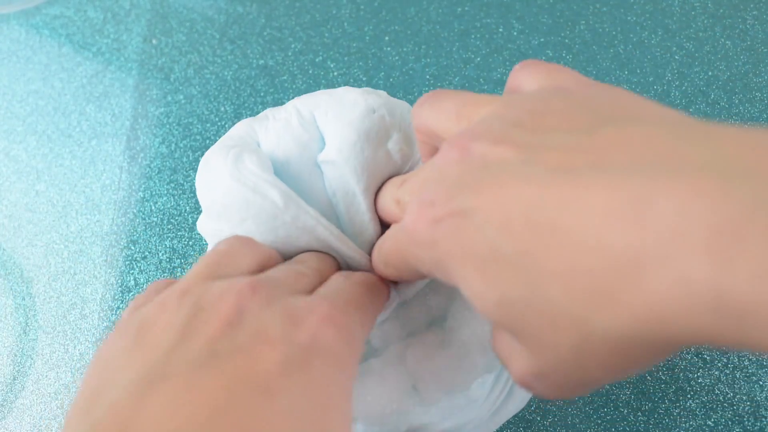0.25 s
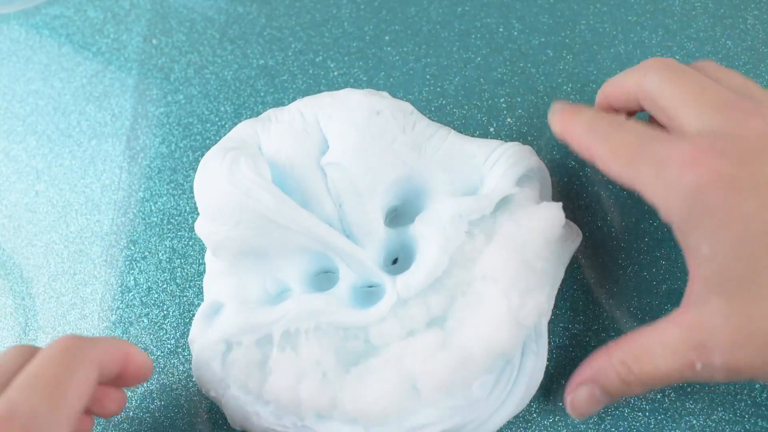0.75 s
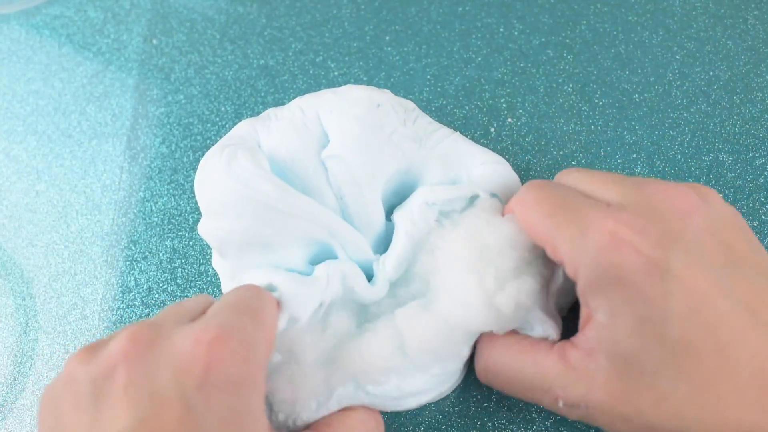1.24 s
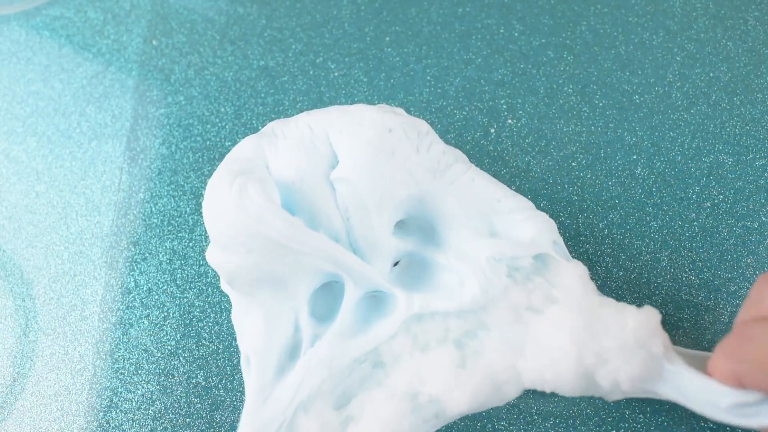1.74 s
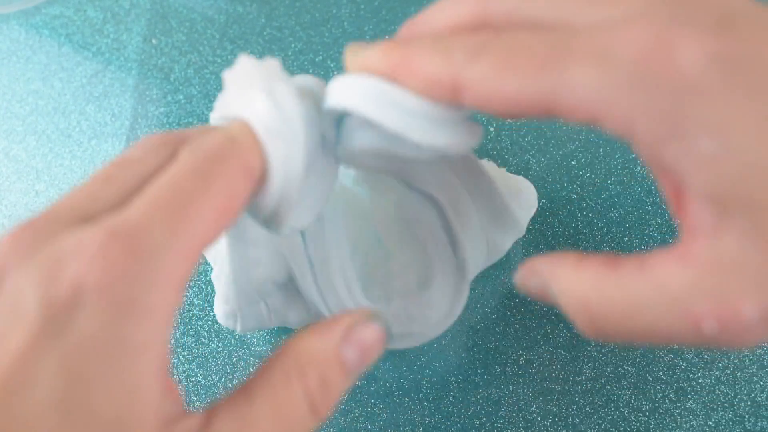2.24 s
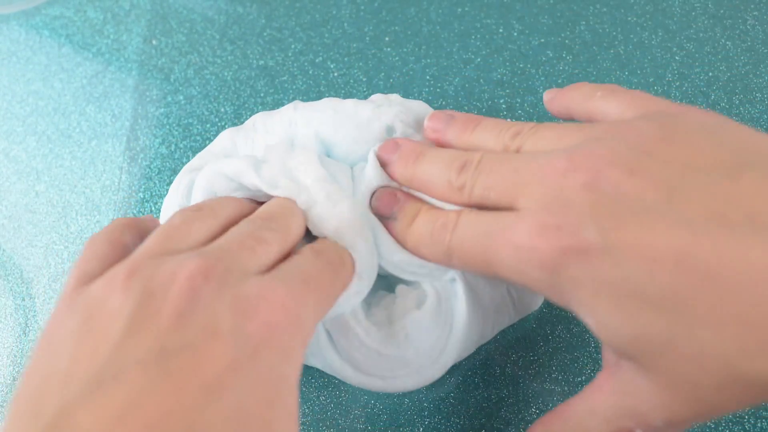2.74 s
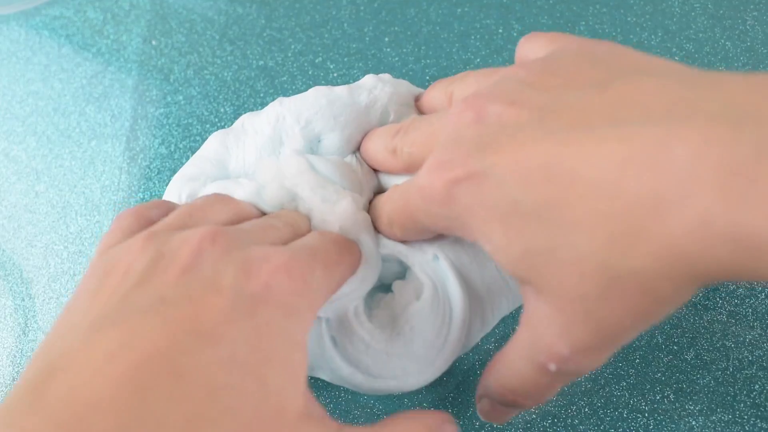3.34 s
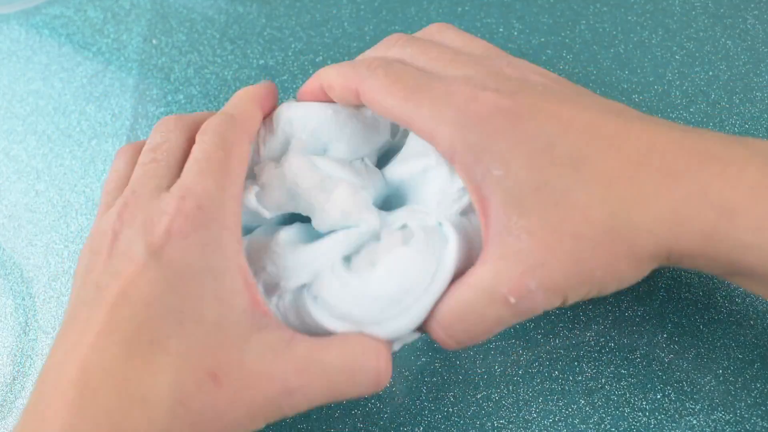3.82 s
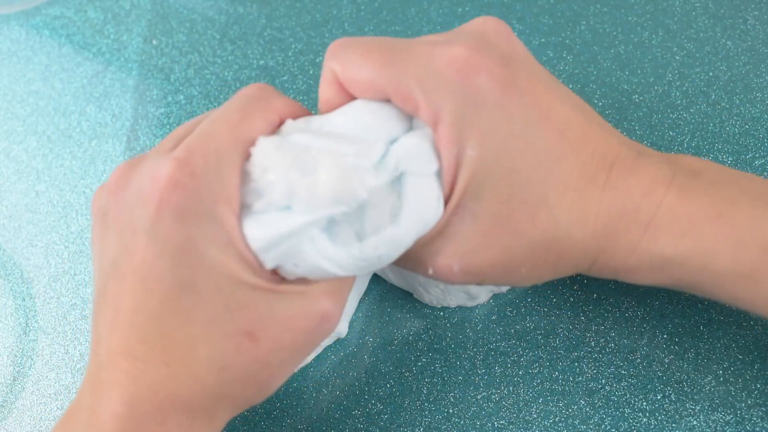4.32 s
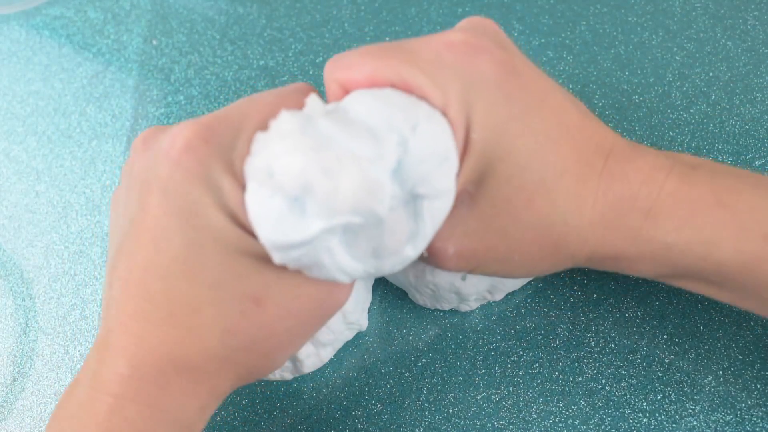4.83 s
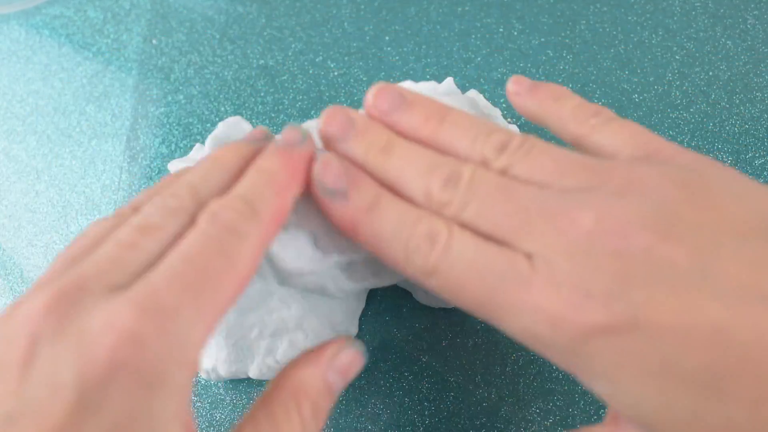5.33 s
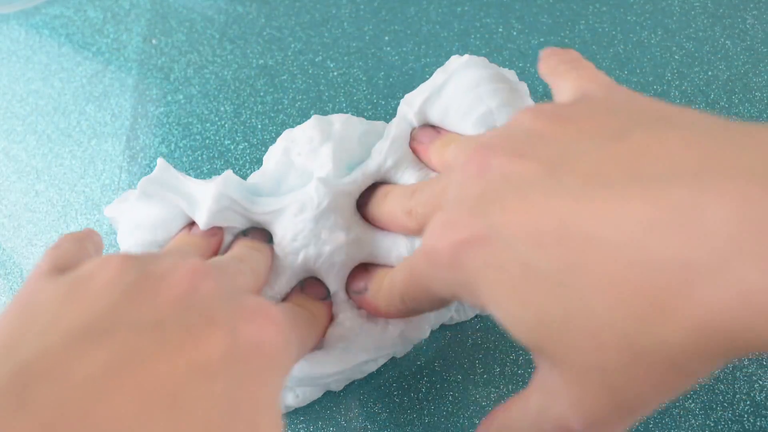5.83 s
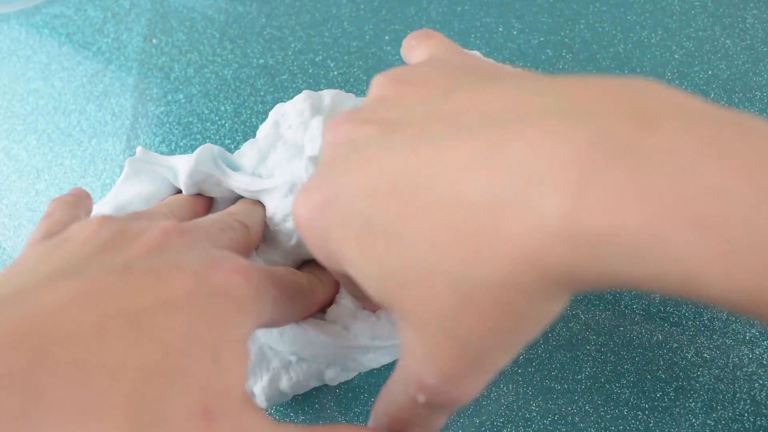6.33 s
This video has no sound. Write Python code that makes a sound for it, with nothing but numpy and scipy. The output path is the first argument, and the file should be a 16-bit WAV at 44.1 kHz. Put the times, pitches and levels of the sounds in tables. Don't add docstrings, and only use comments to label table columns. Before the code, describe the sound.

Hands squeeze and stretch foamy slime up close, with sharp bright pops, fine fizzing crackle, wet squelches and soft low thumps on the table.

```python
import sys
import numpy as np
from scipy import signal
from scipy.fft import rfft, irfft, next_fast_len
from scipy.io import wavfile

SR = 44100
rng = np.random.default_rng(int(sys.argv[2]) if len(sys.argv) > 2 else 0)


def transcribe(signal):
    frames = np.atleast_2d(signal).T
    limited = np.clip(frames, -1, 1)
    pcm = np.round(limited * 32767).astype(np.int16)
    wavfile.write(sys.argv[1], SR, pcm)


def decibels_to_gain(level_db):
    exponent = np.asarray(level_db, float) / 20
    return 10 ** exponent


N = 289737


def rms_one(x):
    return x / np.sqrt(np.mean(x ** 2) + 1e-20)


def colour(x, spectrum):
    size = next_fast_len(N)
    hz = np.maximum(np.arange(size // 2 + 1) * SR / size, 1)
    points_hz, points_db = np.array(spectrum).T
    gain = decibels_to_gain(np.interp(np.log(hz), np.log(points_hz), points_db))
    return irfft(rfft(x, size) * gain, size)[..., :N]


def resonate(x, hz, width_hz):
    r = np.exp(-np.pi * width_hz / SR)
    feedback = [1, -2 * r * np.cos(2 * np.pi * hz / SR), r * r]
    return signal.lfilter([(1 - r * r) / 2, 0, (r * r - 1) / 2], feedback, x)


def drift(rate_hz):
    r = np.exp(-2 * np.pi * rate_hz / SR)
    noise = rng.standard_normal(N + SR)
    return rms_one(signal.lfilter([1], [1, -2 * r, r * r], noise)[SR:])


def pan(left_right_db):
    return decibels_to_gain([[left_right_db / 2], [-left_right_db / 2]])


# f/Hz, level/dB
HISS_COLOUR = [(18, -44), (30, 3), (145, 2.5), (204, -2.5), (295, 2.5), (364, -10), (486, -1), (721, -14.5),
               (2060, -6), (4910, -26), (8980, -1.5), (9970, 4), (10800, -9), (12500, -13), (14400, -24),
               (16000, -22)]
# f/Hz, share of shared power/1
HISS_ALIKE = [(60, 0.53), (240, 0.35), (950, 0.32), (3770, 0.054), (15000, 0.065)]


def hiss():
    shared, left, right = rng.standard_normal((3, N))
    alike = [(hz, 10 * np.log10(np.clip(c, .01, .99))) for hz, c in HISS_ALIKE]
    apart = [(hz, 10 * np.log10(1 - np.clip(c, .01, .99))) for hz, c in HISS_ALIKE]
    noise = colour(shared, alike) + colour(np.array([left, right]), apart)
    whine_hz, whine_width_hz = 10120, 500
    whine = resonate(resonate(noise, whine_hz, whine_width_hz), whine_hz, whine_width_hz)
    whine = decibels_to_gain(-62 + 2.5 * drift(18)) * rms_one(whine)
    return decibels_to_gain(-55) * rms_one(colour(noise, HISS_COLOUR)) + whine


def room(x):
    t60_s, first_wall_s = 0.17, .006
    t = np.arange(round(.4 * SR)) / SR
    tail = rng.standard_normal((2, len(t))) * decibels_to_gain(-60 * t / t60_s) * (t > first_wall_s)
    tail = signal.lfilter([.5], [1, -.35], tail)
    tail = tail / np.sqrt((tail ** 2).sum(1, keepdims=True))
    return signal.fftconvolve(x, tail, axes=1)[:, :N]


# t/s, level/dB
STRETCH = [(0, -52.5), (.3, -52), (.5, -59.5), (.82, -59), (1.1, -55), (1.15, -42.5), (1.62, -45.5),
           (1.88, -53), (2.15, -50), (3.05, -50.5), (3.45, -57), (3.8, -64), (3.9, -37.5), (4.55, -47.5),
           (5.0, -50.5), (5.39, -65), (5.47, -51), (6.57, -53.5)]
# t/s, hold/s, crackle level/dB, squelch level/dB, level of weight on the table/dB
PEELS = [(0.206, 0.077, -51, -62, -74), (0.38, 0.017, -66, -59, -59.5), (0.422, 0.23, -65, -81, -59.5),
         (0.648, .014, -28.5, -33, -39), (0.671, 0.019, -31, -38.5, -38), (0.722, 0.039, -60, -55, -55),
         (0.857, 0.061, -68, -60, -43.5), (0.954, 0.26, -53, -58.5, -49), (1.361, 0.013, -53, -51.5, -54),
         (1.671, 0.088, -43.5, -64, -79), (2.13, 0.044, -48.5, -55, -67), (2.822, 0.028, -61, -65.5, -52.5),
         (3.481, 0.013, -51, -53.5, -53), (3.51, 0.066, -32, -52, -58), (3.534, 0.02, -37, -29, -39),
         (3.595, 0.07, -70, -55, -57), (3.795, 0.025, -55, -53, -48), (3.944, 0.088, -40, -50, -61.5),
         (4.525, 0.056, -47.5, -60, -55.5), (4.71, 0.073, -35.5, -47, -76), (4.987, 0.019, -37, -45.5, -55),
         (5.021, 0.0072, -27, -37, -47), (5.046, 0.052, -26.5, -31.5, -43),
         (5.108, 0.036, -31, -40.5, -53.5), (5.153, 0.022, -39.5, -47.5, -54),
         (5.192, 0.032, -45.5, -53.5, -56), (5.598, 0.11, -70, -63, -59.5),
         (6.142, 0.079, -46.5, -59.5, -76), (6.486, .1, -33.5, -42.5, -44.5)]
# rate/(dB/s) of crackle, squelch, table
RELEASE_DB_PER_S = [792, 449, 340.5]


def tearing():
    onset_db_per_s, sag_db_per_s = 609, 22.5
    t = np.arange(0, N + 64, 64) / SR
    stretch_db = np.interp(t, *np.transpose(STRETCH))
    swing_db = stretch_db + 50
    squelch_db = -60.5 + .75 * swing_db
    rumble_db = -74 + 0.12 * swing_db
    power = decibels_to_gain([stretch_db, squelch_db, rumble_db]) ** 2
    for start, hold, *levels_db in PEELS:
        onset = onset_db_per_s * np.maximum(start - t, 0)
        sag = sag_db_per_s * np.clip(t - start, 0, hold)
        release = np.outer(RELEASE_DB_PER_S, np.maximum(t - start - hold, 0))
        power = power + decibels_to_gain(np.reshape(levels_db, (3, 1)) - onset - sag - release) ** 2
    return [np.interp(np.arange(N) / SR, t, 10 * np.log10(p)) for p in power]


# f/Hz, bandwidth/Hz, level/dB
TABLE_MODES = [(83.5, 123, -0.5), (165, 6.8, 8.5), (290, 20, 2), (560, 340, -8.5)]
# t/s, peak level/dB, main f/Hz
THUMPS = [(0.448, -29, 112), (0.626, -35, 128), (0.839, -22.5, 165), (.65, -33, 100), (.68, -40, 130),
          (0.701, -41, 120), (.897, -26, 159), (.917, -34, 152), (.962, -44, 169), (1.061, -42, 290),
          (1.368, -47.5, 156), (3.473, -44, 200), (3.491, -40, 200), (3.523, -23, 147), (3.537, -31, 119),
          (3.587, -37, 150), (3.792, -35.5, 290), (3.803, -37.5, 160), (3.93, -34.5, 157),
          (4.514, -45, 159), (4.548, -37.5, 304), (4.685, -49, 80.6), (4.831, -42, 300),
          (5.628, -44.5, 113)]


def table_modes(push):
    return sum(decibels_to_gain(db) * resonate(push, hz, width_hz) for hz, width_hz, db in TABLE_MODES)


def table(rumble_db):
    shake = signal.lfilter([1], [1, -.96], rng.standard_normal(N) * decibels_to_gain(2.6 * drift(14)))
    rumble = decibels_to_gain(rumble_db - 0.5) * rms_one(table_modes(shake))
    t = np.arange(6000) / SR
    out = np.append(rumble, 0 * t)
    for s, peak_db, hz in THUMPS:
        push = -np.exp(-(t * hz / .11 - 2) ** 2)
        knock = resonate(push, hz, 0.14 * hz) + 0.25 * table_modes(push)
        at = round(s * SR)
        out[at:at + len(t)] += decibels_to_gain(peak_db) * knock / np.abs(knock).max()
    return out[:N]


# t/s, peak level/dB
PUFFS = [(1.6668, -29.5), (4.683, -31), (3.6, -29)]


def puffs():
    t, width_s = np.arange(N) / SR, 0.0002
    return sum(decibels_to_gain(db) * np.exp(-((t - s) / width_s) ** 2) for s, db in PUFFS)


def grains(per_s, low_hz, high_hz, cycles, spread_db, clump_db, patch_db, wide_db):
    sizes = decibels_to_gain(spread_db * np.minimum(rng.exponential(1, N), 4))
    sizes = sizes * rng.choice([-1, 1], N) / np.sqrt(per_s)
    born = rng.random(N) < per_s * decibels_to_gain(clump_db * drift(25)) / SR
    place = pan(1) ** (wide_db * np.clip(rng.standard_normal(N), -1.5, 1.5))
    clicks = place * sizes * born
    dealt = rng.integers(0, 12, N)
    patches = [decibels_to_gain(patch_db * drift(19)) for _ in range(4)]
    out = 0
    for k, hz in enumerate(np.geomspace(low_hz, high_hz, 12)):
        out = out + resonate(clicks * (dealt == k) * patches[k // 3] + 1e-18, hz, hz / cycles)
    return rms_one(out)


def gurgle(rumble_db):
    lumps = grains(250, 315, 960, cycles=5.6, spread_db=-0.5, clump_db=4.0, patch_db=5.5, wide_db=13.0)
    return decibels_to_gain(rumble_db - 6) * lumps


def squelch(level_db):
    per_s = np.interp(level_db, [-60, -46], [1800, 5000])
    wet = grains(per_s, 397, 3270, cycles=2.2, spread_db=2.5, clump_db=1.9, patch_db=2.2, wide_db=12.5)
    hollow = resonate(wet, 1200, 330)
    return decibels_to_gain(level_db) * (wet + decibels_to_gain(-14) * hollow)


# f/Hz, level/dB
CRACKLE_COLOUR = [(880, -35), (1500, -12), (1870, -15), (2250, -2.5), (2540, 6), (2800, 2.5), (9280, 8.5),
                  (13800, 1.5), (16000, 2)]


def crackle(level_db):
    per_s = np.interp(level_db, [-50, -36], [4500, 18000])
    cells = grains(per_s, 2000, 13700, cycles=4.3, spread_db=3.0, clump_db=2.5, patch_db=1.95, wide_db=15.5)
    return decibels_to_gain(level_db - 1.9) * rms_one(colour(cells, CRACKLE_COLOUR))


# t/s, peak level/dB, f/Hz, left-right level/dB
BLIPS = [(.278, -55, 990, 0), (0.628, -18, 1410, -7), (.653, -32.5, 675, -12), (.84, -35.5, 880, 5),
         (.84, -32.5, 292, 5), (1.74, -46.5, 1500, 0), (3.472, -44, 2000, 0), (3.49, -42, 2020, 0),
         (1.36, -41.5, 1420, 0), (1.377, -40, 2500, 0), (1.427, -47, 1200, 3), (1.78, -42, 2360, 0),
         (1.85, -52, 1400, 0), (2.59, -54, 710, 0), (3.077, -48, 1690, 0), (3.526, -26, 700, 12),
         (3.536, -29, 950, 0), (3.551, -31, 560, 0), (3.566, -34.5, 404, 3), (4.107, -31, 1710, 0),
         (6.195, -51, 1500, 0), (4.986, -45.5, 470, -2), (5.015, -34.5, 815, 2), (5.22, -46, 1200, 3),
         (0.682, -35.5, 600, 14), (0.838, -32, 520, -9), (0.888, -39, 745, 6), (1.972, -45, 1570, -4),
         (2.055, -48.5, 985, -1), (2.802, -34, 2440, 0), (1.263, -41, 3000, 0), (2.873, -47, 856, 2),
         (3.789, -51, 820, 9), (4.514, -57, 1260, 2), (4.791, -32, 1470, -4), (4.82, -45.5, 870, 13),
         (6.255, -45.5, 970, 4)]


def blips():
    size = 2048
    out, t = np.zeros((2, N + size)), np.arange(size) / SR
    for s, peak_db, hz, pan_db in BLIPS:
        decay = decibels_to_gain(-60 * t * hz / 15.4)
        ring = np.sin(2 * np.pi * hz * t) * decay * np.minimum(t / 0.00095, 1)
        at = round(s * SR)
        out[:, at:at + size] += decibels_to_gain(peak_db + 9.5) * ring * pan(pan_db)
    return out[:, :N]


# t/s, peak level/dB, ring f/Hz, left-right level/dB
TICKS = [(0.6507, -2, 3000, 5.5), (0.6507, -3, 2860, -6), (.6505, -7.5, 7500, -1), (1.1278, -18, 3950, 3),
         (1.1862, -15.5, 7970, 2), (1.2605, -24, 9500, -5), (1.317, -12.5, 7800, 1.5),
         (1.5016, -8.5, 10800, -1), (1.518, -7.5, 10300, -2.5), (1.5956, -18.5, 10100, -7.5),
         (1.6534, -6, 8100, 1), (1.667, -0.5, 8000, -0.5), (2.16, -24, 7900, -9),
         (2.8482, -10, 10200, -2.5), (2.4198, -30.5, 2980, -1), (2.8816, -24, 9100, 0),
         (2.92, -16.5, 9260, -9), (2.9748, -25, 9500, -1), (4.1015, -10.5, 9170, -8),
         (4.1151, -9, 7900, 1.5), (4.1866, -12, 6070, 1.5), (4.226, -19, 9780, 1.5),
         (4.2926, -6.5, 7400, -1.5), (4.4019, -16, 6600, -8), (1.6671, -25, 1510, -1),
         (2.274, -37, 4000, 2), (2.606, -36, 6540, -.5), (2.606, -37, 2200, 2), (2.705, -37, 3000, 0),
         (2.791, -30, 9000, 3.5), (3.0028, -25.5, 6500, 1), (3.0473, -39, 7000, 2.5), (3.051, -38, 2000, 2),
         (3.089, -37, 5500, 0), (3.1321, -32, 7480, 1.5), (3.267, -43, 3500, 0), (3.383, -50, 3500, 6),
         (3.4324, -41, 4000, 4), (5.346, -31.5, 8000, 8.5), (5.4868, -25, 7770, -1.5),
         (5.518, -30, 7000, 0), (5.538, -22, 7000, 1), (6.245, -24, 6490, 5.5), (6.339, -37, 5000, 1),
         (4.758, -16, 9600, -13.5), (4.7603, -9.5, 10470, .5), (4.8118, -8.5, 9220, 2)]
SPRITZES = [(0.0155, -29, 9050, 7), (0.158, -27, 7550, -1), (.228, -32, 10600, -.5), (0.6255, 2, 8100, 0),
            (0.8893, -28, 1330, 1), (1.669, -2.5, 7900, -2.5), (2.263, -27, 9100, 1.5),
            (2.3898, -21.5, 10100, 2), (2.675, -12, 9000, 2.5), (2.6792, -20, 2960, -1.5),
            (2.914, -21.5, 9500, -2), (2.9492, -19.5, 7300, -1.5), (4.0001, -0.5, 7100, -1.5),
            (4.3696, -18.5, 9000, 6), (4.455, -9, 6860, 2), (4.493, -16, 10340, 2),
            (4.5467, -20.5, 9100, -2.5), (4.6202, -15, 8440, 2.5), (4.6423, -19, 11640, 2),
            (4.683, 7.5, 5970, -1.5), (4.686, -3, 3250, 9), (4.7497, -8.5, 8900, -2.5),
            (4.8468, -18.5, 13480, 14), (4.8568, -13.5, 8800, 1.5), (4.912, -12.5, 10300, 0),
            (5.017, -19, 7600, -17), (2.288, -30, 7000, 3), (2.352, -40, 10100, 7), (2.454, -34, 6000, 4),
            (2.508, -29.5, 9000, 1), (2.769, -34, 9220, 0), (6.1367, -28, 7910, 4), (6.372, -35, 10100, 8),
            (6.4685, -25, 9000, 1.5), (6.485, -20, 8880, 3), (5.4341, -12.5, 10700, -2.5),
            (5.6495, -20, 7500, -5)]
SPLATS = [(.0071, -25.5, 7360, -2), (0.8385, -17.5, 1730, -4.5), (.8388, -29, 6000, 2),
          (0.896, -23.5, 2700, 1), (1.03, -27.5, 6340, 1.5), (1.062, -34, 2150, 0),
          (1.4345, -17.5, 7800, -4), (2.14, -17.5, 9700, -4.5), (3.2134, -20, 7940, 0),
          (3.8687, -20.5, 7740, -2), (3.9289, 0, 8450, 2.5), (3.9316, 2, 9800, 1.5), (4.0123, -9, 8700, 3),
          (4.0398, -20, 1700, -2), (4.255, -27, 13440, 0), (4.344, -20, 8800, -2),
          (4.4288, -27, 9160, -2.5), (4.948, -15, 6000, 5.5), (5.504, -30, 4460, -3),
          (5.5442, -17.5, 8250, -3), (5.6322, -13.5, 2520, -3.5), (5.6653, -20, 9300, -1.5),
          (5.7989, -23, 6930, -3), (5.886, -24, 5040, 5.5)]
SNAPS = [(.1394, -32, 2300, 1), (0.347, -18.5, 7900, 1.5), (0.3963, -26, 8100, -3),
         (0.4364, -23, 5300, 1.5), (0.6263, 4, 3020, 1), (.628, 0, 2900, 2), (0.6421, 1, 3000, -7),
         (.677, -13, 7000, 2.5), (0.696, -11, 7400, 2), (1.686, -28, 2200, 0), (1.2204, -16.5, 7200, -3),
         (1.2753, -15.5, 8400, -3), (1.2996, -12.5, 8340, -3), (2.0277, -21.5, 11700, -9.5),
         (2.618, -26, 9400, -1), (2.641, -25.5, 2580, -3.5), (2.721, -18.5, 8650, -3),
         (2.8862, -28, 9600, 4), (3.9054, -9, 7200, -6), (4.0863, -23, 1980, 3), (4.335, -21, 3500, -1),
         (4.984, -12, 6400, -6.5), (5.0472, -10, 5500, -9.5), (5.059, -13.5, 8500, -4.5),
         (5.5627, -13.5, 7850, -2), (5.653, -25, 8570, -1), (5.6622, -23, 10600, -1),
         (6.0241, -24, 3540, 3), (6.101, -28, 8000, 1.5)]
SMACKS = [(2.7998, -15.5, 2190, 0.5), (3.5237, 0.5, 2160, -2.5), (4.1078, -11.5, 5810, -3.5),
          (4.515, -13, 7700, -2.5), (5.089, -16, 4000, 2), (6.2624, -22, 3830, 0),
          (6.4356, -28.5, 6200, -2), (6.5206, -16, 6720, 0), (6.5521, -12, 8300, 3)]
PRICKS = [(0.1121, -29, 9630, 3.0), (0.1343, -32.5, 2180, 2), (0.1704, -37, 10100, 1),
          (0.1935, -29, 10100, 3.0), (0.2234, -31, 9820, -1), (0.2628, -32, 10200, -1),
          (0.4174, -34, 10100, 2.0), (1.1079, -34, 10100, 1), (1.1158, -26, 4860, -2),
          (1.1474, -32, 9540, -1.5), (1.1578, -25, 8110, 1.0), (1.2044, -24, 7080, -3),
          (1.3112, -17, 9540, 1.5), (1.3384, -33, 9820, -1.0), (1.3604, -27, 9330, -0.5),
          (1.4134, -23, 7500, -4.5), (1.4584, -22, 8130, -1.5), (1.4664, -23, 9930, -2.5),
          (1.5444, -28, 10050, -1.5), (1.5854, -24, 8860, -4.5), (1.6114, -28, 9730, -2.0),
          (1.6274, -25, 9000, -2.5), (1.7444, -27, 8730, 0.0), (1.7744, -29, 10300, 0.0),
          (3.4664, -33, 9930, 0.5), (3.7374, -33, 10100, 5.0), (3.8087, -38, 10100, 3.0),
          (3.8437, -27, 10300, -1.5), (3.894, -17, 7400, -4.0), (4.0674, -24, 9530, -2.0),
          (4.1394, -28, 9430, 0.0), (4.2084, -21, 10100, -1.0), (4.2344, -26, 6240, 0.0),
          (4.2614, -24, 9120, 3), (4.382, -20, 9390, -2.5), (4.7194, -19, 5790, -0.5),
          (4.8214, -23, 10600, 1.0), (4.9326, -17, 8000, 2), (5.1304, -25, 9700, 2),
          (5.2204, -26, 9190, 1.5)]
# broad snap level/dB, spatter level/dB, table echo level/dB
SKINS = [
    (-12, -24, -14),
    (-12, -16.5, -6.5),
    (-2.5, -14, -13),
    (1.5, -22.5, -28.5),
    (9, -14, -7),
    (-14, -20.5, -12),
]


def pops():
    size, echo_s, spatter_t60_s = 4096, .0018, 0.035
    out, t = np.zeros((2, N + size)), np.arange(size) / SR
    kinds = [TICKS, SPRITZES, SPLATS, SNAPS, SMACKS, PRICKS]
    rows = [(*row, *skin) for kind, skin in zip(kinds, SKINS) for row in kind]
    broad = signal.butter(2, [750, 11000], "band", fs=SR, output="sos")
    for s, peak_db, hz, pan_db, snap_db, spatter_db, echo_db in rows:
        mid, left, right = rng.standard_normal((3, size))
        click = np.zeros((2, size))
        click[:, 4] = 1
        click[:, round(echo_s * SR)] = decibels_to_gain(echo_db + 2.5 * mid[0])
        click[1] = np.roll(click[1], round(pan_db / 2))
        spatter = 0.56 * mid + 0.62 * np.array([left, right])
        after_snaps = np.repeat(np.clip(mid[:size // 32], -2, 1), 32)
        spatter = spatter * decibels_to_gain(3.0 * after_snaps)
        both = np.array([click, spatter])
        ring = resonate(resonate(both, hz, 1.3 * hz), hz, 0.76 * hz)
        snap_share = np.reshape([1, 1.6], (2, 1, 1))
        snap = decibels_to_gain(snap_db - 8.0) * snap_share * signal.sosfilt(broad, both)
        click, spatter = ring + snap
        dying = decibels_to_gain(spatter_db + 2.5 - 60 * t / spatter_t60_s) * np.minimum(t / 0.00095, 1)
        pop = click / np.abs(click).max() + dying * rms_one(spatter)
        at = round(s * SR)
        out[:, at:at + size] += decibels_to_gain(peak_db + 1.14) * pop * pan(pan_db)
    return out[:, :N]


def scene():
    crackle_db, squelch_db, rumble_db = tearing()
    soft_top = signal.butter(2, 12430, fs=SR, output="sos")
    bursts = signal.sosfilt(soft_top, pops())
    slime = bursts + blips() + crackle(crackle_db) + squelch(squelch_db) + gurgle(rumble_db)
    left, right = slime + decibels_to_gain(-14.5) * room(slime)
    bass_cut = signal.butter(1, 1100, "high", fs=SR)
    side = signal.lfilter(*bass_cut, left - right)
    stereo = (left + right + 1.11 * side * [[1], [-1]]) / 2
    return stereo + table(rumble_db) + puffs() + hiss()


def roll_off(x):
    return signal.sosfilt(signal.butter(12, 16420, fs=SR, output="sos"), x)


def record(dry):
    top_cut = signal.cheby2(10, 50, 16400, fs=SR, output="sos")
    mix = np.clip(signal.sosfilt(top_cut, dry), -1, 1)
    return roll_off(mix)


dry = scene()
out = record(dry)
transcribe(out)
```